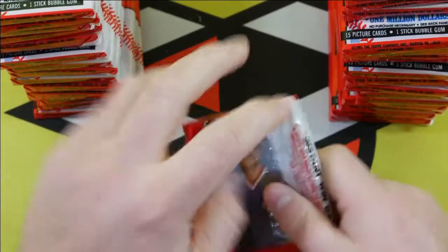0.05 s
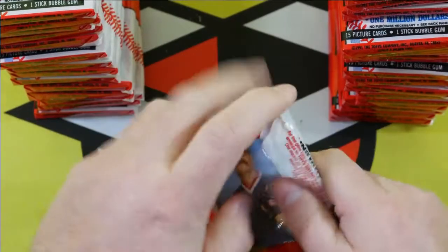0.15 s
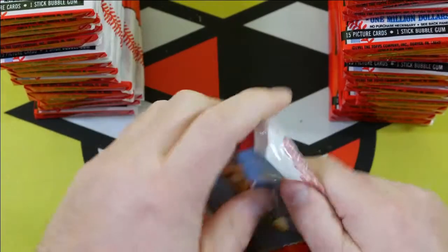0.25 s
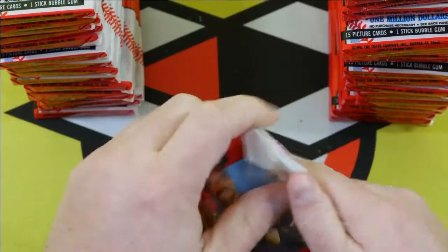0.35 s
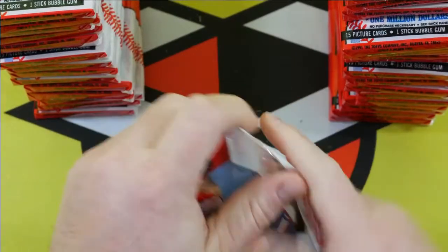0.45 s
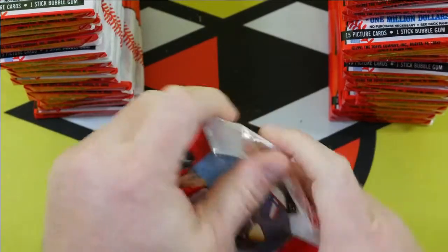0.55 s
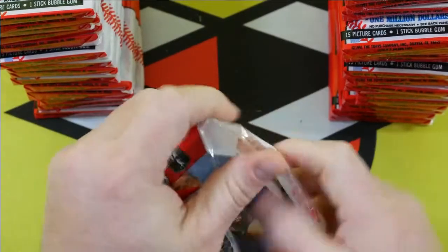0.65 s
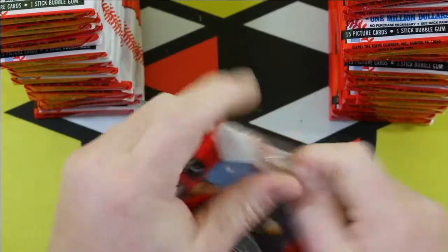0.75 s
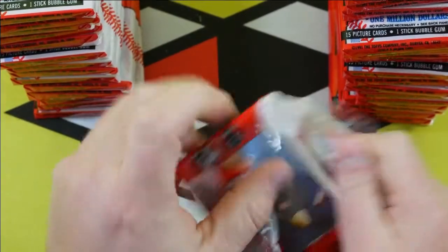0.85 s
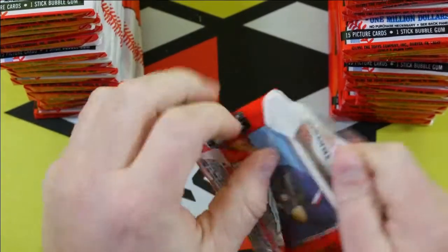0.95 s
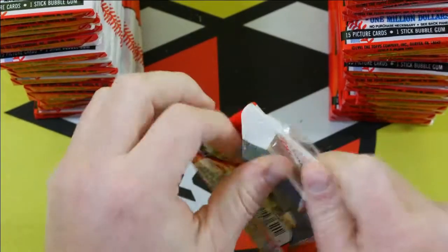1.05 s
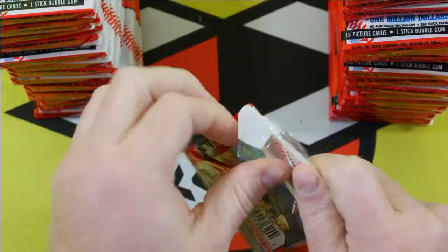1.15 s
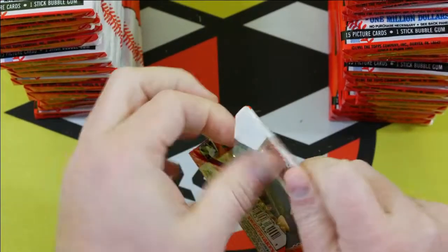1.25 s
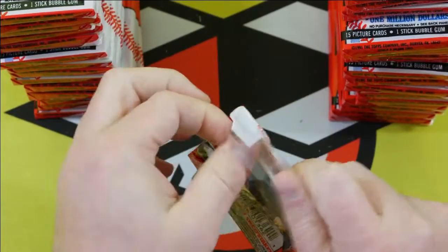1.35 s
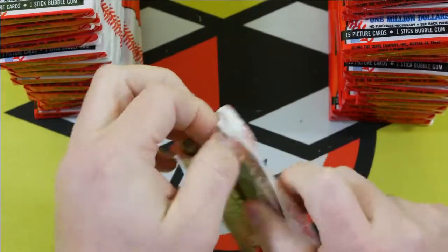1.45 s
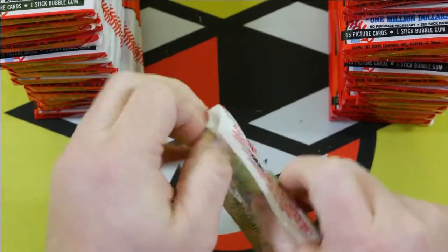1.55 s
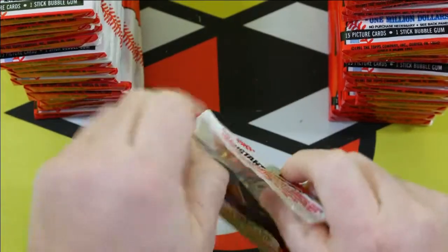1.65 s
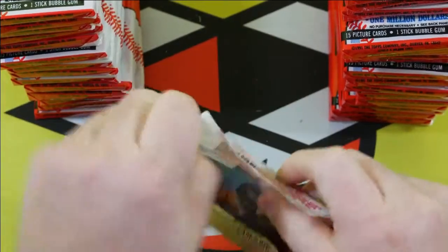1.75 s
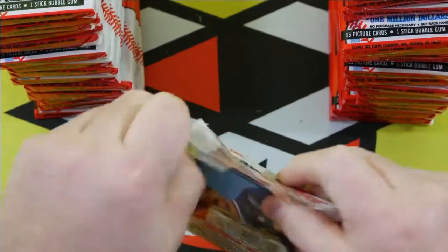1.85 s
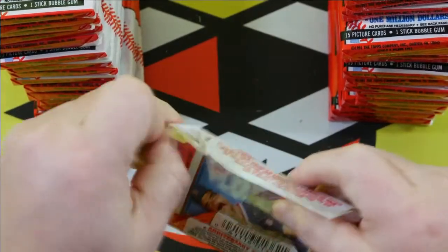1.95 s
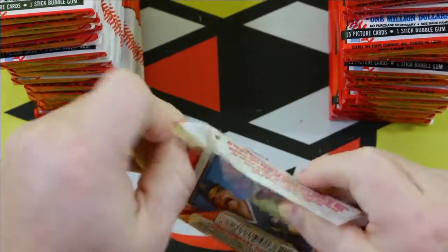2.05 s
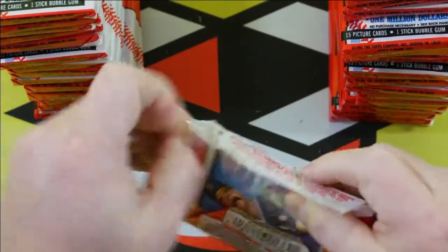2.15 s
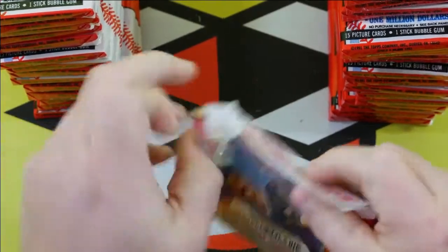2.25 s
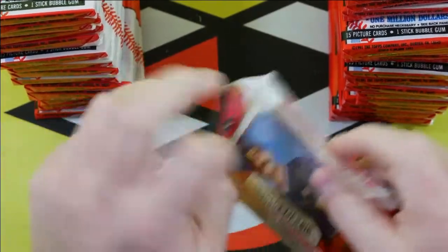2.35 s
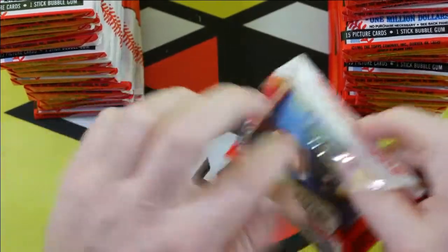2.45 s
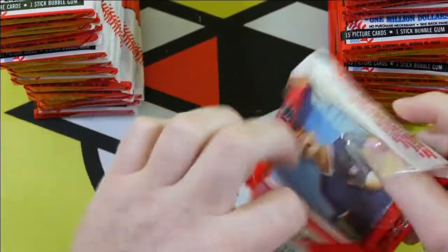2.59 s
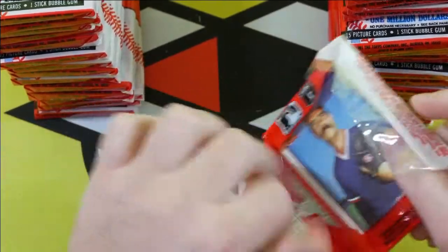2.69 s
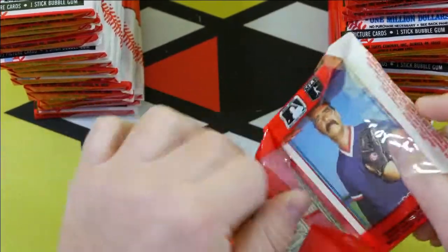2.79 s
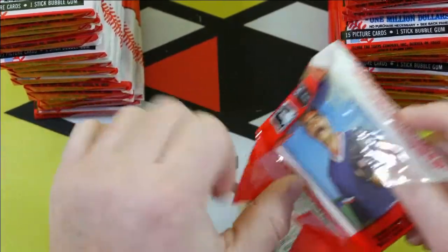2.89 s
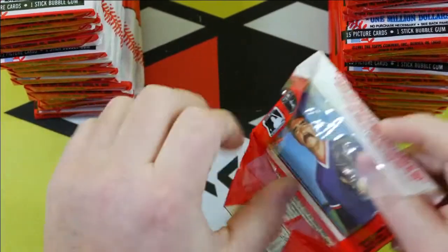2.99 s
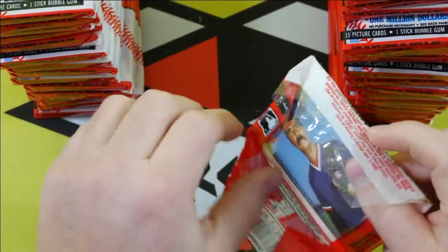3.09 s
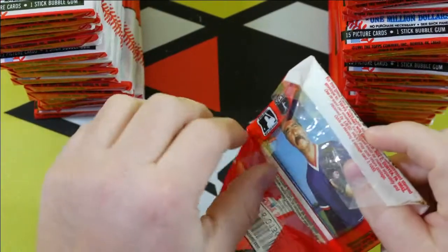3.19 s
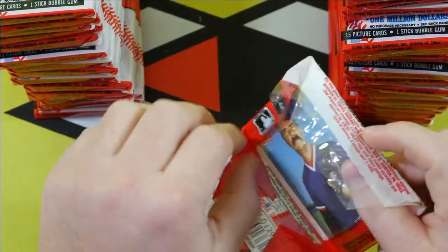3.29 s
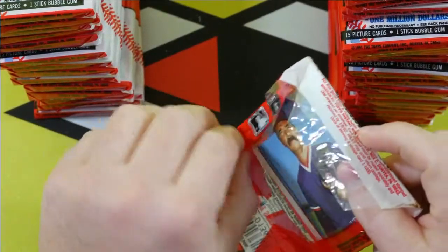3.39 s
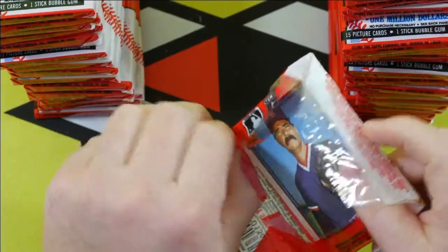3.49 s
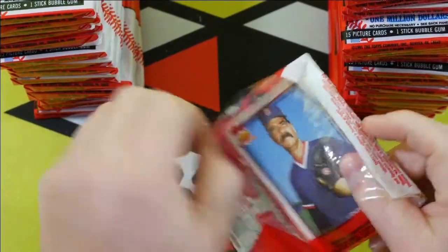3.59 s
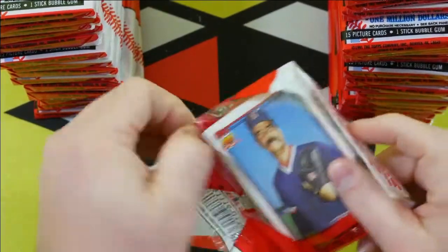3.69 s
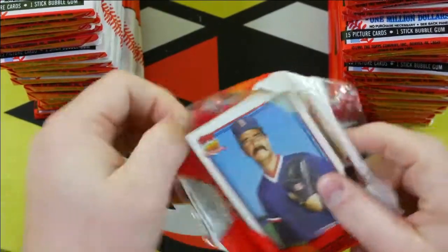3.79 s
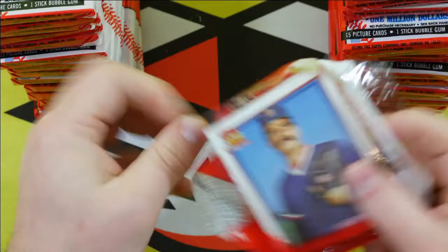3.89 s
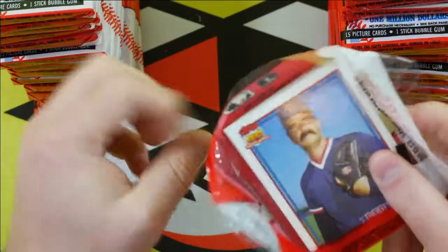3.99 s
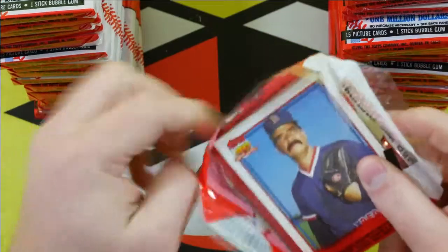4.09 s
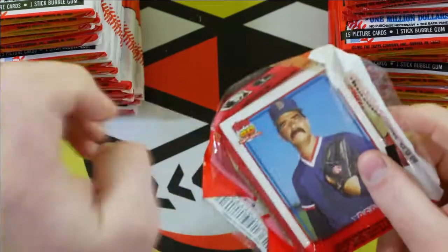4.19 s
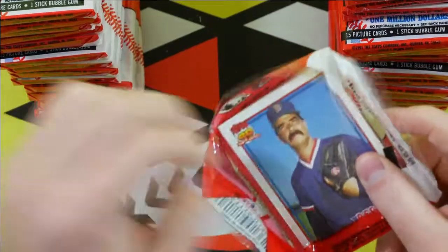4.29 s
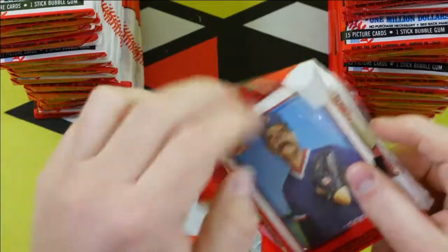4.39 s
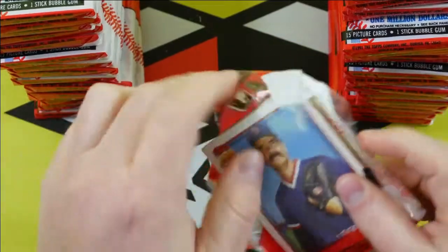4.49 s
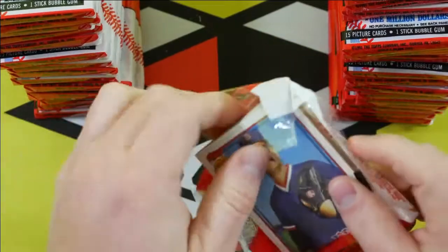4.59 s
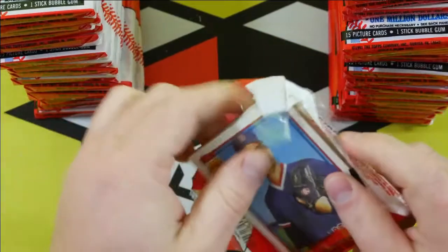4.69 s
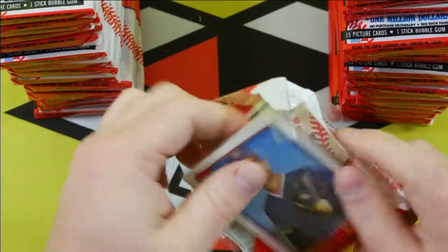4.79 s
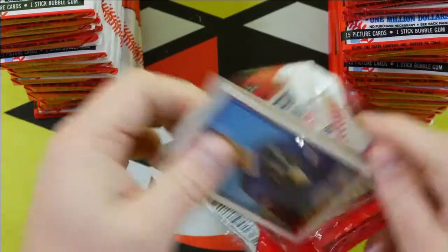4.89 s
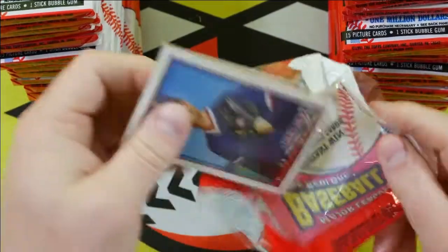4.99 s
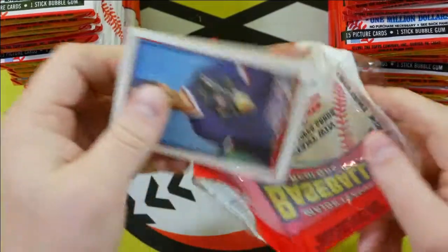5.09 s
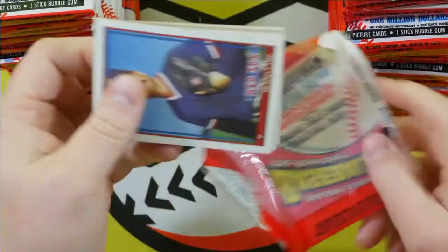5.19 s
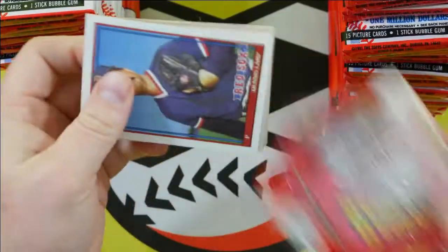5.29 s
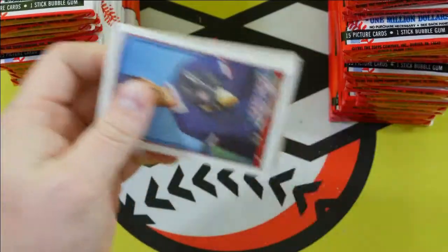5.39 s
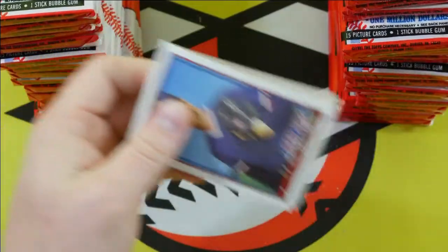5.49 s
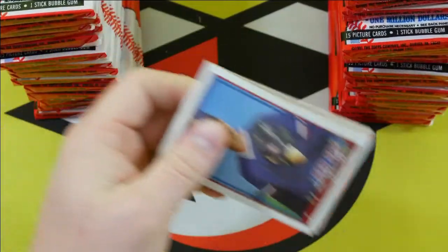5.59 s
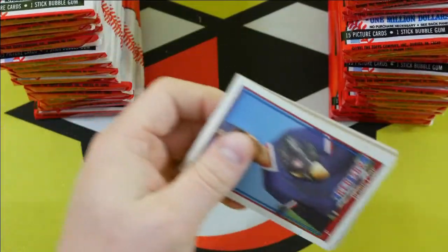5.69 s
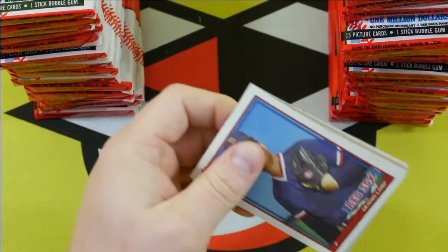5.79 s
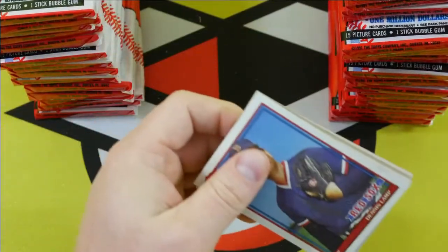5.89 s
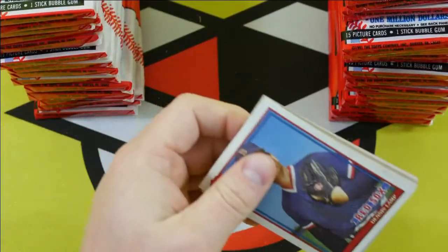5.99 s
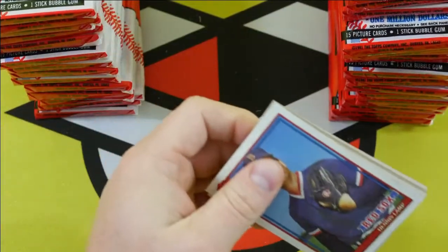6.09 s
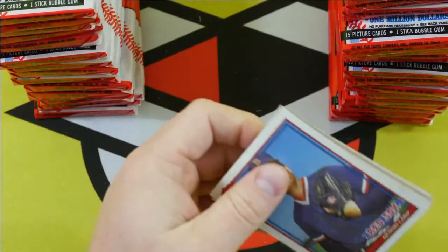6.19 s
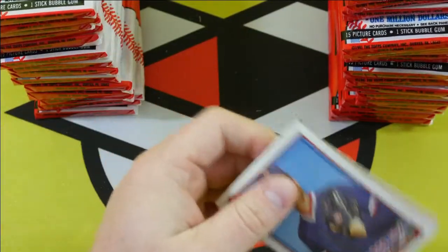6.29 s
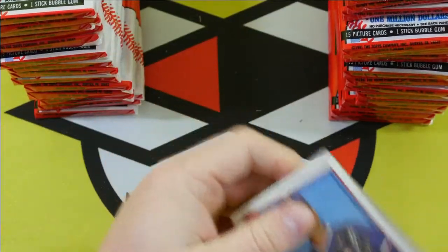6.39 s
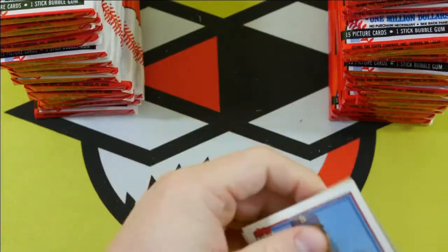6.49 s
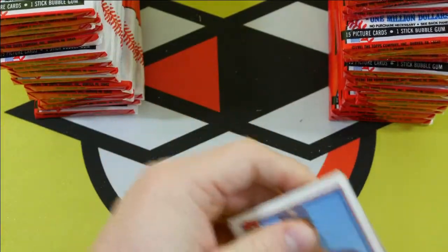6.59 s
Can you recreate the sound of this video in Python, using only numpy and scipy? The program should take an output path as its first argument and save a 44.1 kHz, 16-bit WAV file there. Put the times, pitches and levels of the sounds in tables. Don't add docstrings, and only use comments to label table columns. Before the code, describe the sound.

A thin card wrapper is handled and opened very close to the microphone in a quiet room. From 0 to 1.2 s fingers pick at it with bright, irregular snaps and fine crackle, peaking in a hard crack with a short rip and low thump near 0.77 s. From 1.25 to 2.1 s creases keep popping, with a strong tearing burst at 1.9 s. Between 2.2 and 3.4 s it unfolds in scattered crackles, with rips and thuds around 2.65 s, then sparser ticks. At 3.6 s a dense, loud peel crackles, repeating more lightly until 4.1 s. Duller, heavier thuds and rubbing come at 4.4 to 4.8 s as the stack slips free. Crinkles weaken from 5 to 5.9 s, leaving a faint smooth card slide near 6.25 s over soft low hum and hiss. Small hollow stack knocks and close table echoes accompany the handling.

```python
import sys
import numpy as np
from scipy import signal
from scipy.fft import rfft, irfft, next_fast_len
from scipy.io import wavfile
from scipy.ndimage import uniform_filter1d, map_coordinates

SR = 44100
rng = np.random.default_rng(int(sys.argv[2]) if len(sys.argv) > 2 else 0)


def store_wav(level_fs):
    pcm = np.round(np.clip(np.atleast_2d(level_fs), -1, 1) * 32767)
    wavfile.write(sys.argv[1], SR, pcm.T.astype(np.int16))


def ratio_of_db(decibels):
    return 10 ** (np.asarray(decibels, float) / 20)


N = 293265
LOAD_S = 0.006


def unit(x):
    return x / np.sqrt(np.mean(x ** 2) + 1e-20)


def along(points, hz):
    f, v = np.transpose(points)
    return np.interp(np.log(hz + 1), np.log(f + 1), v)


def wobble(rate):
    knots = rng.standard_normal(int(N * rate / SR) + 4)
    return map_coordinates(knots, [np.arange(N) * rate / SR])


def coloured(x, spectrum):
    m = 2 * next_fast_len(N // 2 + 4096)
    gain = ratio_of_db(along(spectrum, np.fft.rfftfreq(m, 1 / SR)))
    cepstrum = irfft(np.log(gain + 1e-6), m)
    cepstrum[1:m // 2] *= 2
    cepstrum[m // 2 + 1:] = 0
    return unit(irfft(rfft(x, m) * np.exp(rfft(cepstrum)), m)[:N])


def resonance(f, hz, q):
    return 1j * f * hz / q / (hz * hz - f * f + 1j * f * hz / q)


def scattered(start_s, rows):
    at = np.round(start_s * SR).astype(int)[:, None] + np.arange(rows.shape[1])
    return np.bincount(np.clip(at, 0, N).ravel(), rows.ravel(), N + 1)[:N]


# (start [s], length [s], crackle [dB], rub of the pack [dB], weight on the table [dB])
HAND_MOVES = [(0.0, 0.085, -49, -58, -37.5), (0.1, 0.37, -42.5, -61, -46.5), (0.496, 0.23, -49, -59.5, -70),
              (0.78, 0.12, -43.5, -58, -62), (0.923, 0.21, -56, -57.5, -44.5), (1.29, 0.029, -55, -57, -66),
              (1.4, 0.25, -50, -53.5, -60), (1.668, 0.16, -49.5, -56, -61),
              (1.916, 0.098, -39.5, -50.5, -37), (2.123, 0.22, -57, -60, -52),
              (2.398, 0.44, -47.5, -57, -43.5), (3.233, 0.14, -47.5, -69.5, -58),
              (3.569, 0.2, -37.5, -48, -49), (3.837, 0.13, -41.5, -53.5, -42),
              (4.04, 0.087, -54, -55.5, -71), (4.377, 0.25, -47.5, -55, -50), (4.7, 0.29, -47.5, -55, -66),
              (5.013, 0.28, -58, -59.5, -48), (5.46, 0.34, -60, -67, -53.5), (5.764, 0.16, -70, -63, -70)]


def gripped(column, attack_db_per_s, release_db_per_s):
    t = np.arange(0, N, 64) / SR
    moves = np.array(HAND_MOVES)[:, :, None]
    start, length = moves[:, 0], moves[:, 1]
    early = np.maximum(start - t, 0)
    late = np.maximum(t - start - length, 0)
    power = ratio_of_db(moves[:, column] - attack_db_per_s * early - release_db_per_s * late) ** 2
    still = ratio_of_db(-90) ** 2
    return np.interp(np.arange(N) / SR, t, 10 * np.log10(power.sum(0) + still))


def rub_level():
    return gripped(column=3, attack_db_per_s=500, release_db_per_s=150)


# (frequency [Hz], level per Hz [dB])
TABLE_RUMBLE = [(5, -2.5), (13, 11.5), (21, 5.5), (32, -2), (55, -8.5), (90, -23), (140, -41.5)]
# (frequency [Hz], level per Hz [dB])
BUILDING_HUM = [(10, -37.5), (30, 4.5), (85, -4), (120, -15.5), (200, -36.5)]
# (frequency [Hz], level per Hz [dB])
MIC_HISS = [(80, -12.5), (130, 3), (250, -5.5), (900, -11.5), (3000, -14.5), (14500, -17.5), (16000, -30)]


def background():
    weight_db = gripped(column=4, attack_db_per_s=17, release_db_per_s=17)
    table = ratio_of_db(weight_db - 2.5 + 2.2 * wobble(4.93)) * coloured(rng.standard_normal(N), TABLE_RUMBLE)
    building = ratio_of_db(-61 + 0.46 * wobble(3.1)) * coloured(rng.standard_normal(N), BUILDING_HUM)
    hiss = ratio_of_db(-69) * coloured(rng.standard_normal(N), MIC_HISS)
    return table + building + hiss


# (delay [s], level [dB])
NEAR_ECHOES = [(.0022, -4), (.0035, -8), (.009, -7.5), (.01, -11), (0.016, -30), (.0182, -32.5),
               (0.025, -33)]


def crack(t, run_s, dull):
    loading = t / LOAD_S
    shape = ratio_of_db(-19) * loading ** 2 * (loading < 1)
    for late_s, echo_db in [(0.0015, 0.015)] + NEAR_ECHOES:
        u = (t - LOAD_S - late_s) / run_s
        burst = np.exp(-np.abs(u))
        spike = 2.5 * np.exp(-np.abs(u) / 0.14)
        shape = shape + ratio_of_db(dull * echo_db) * (u > 0) * (burst + spike)
    return shape


def grains(count, spread_db, clump_db, clump_rate):
    u = rng.random((count, 3))
    size_db = np.minimum(-spread_db * np.log(1 - u[:, 1]), 11)
    size = ratio_of_db(size_db) * np.sign(u[:, 2] - .5)
    return np.bincount((u[:, 0] * N).astype(int), size, N) * ratio_of_db(clump_db * wobble(clump_rate))


# (frequency [Hz], level per Hz [dB])
FILM_COLOUR = [(880, -21.5), (1700, -0.5), (4000, -0.5), (7000, 3), (12500, -5), (15700, -13)]
# (frequency [Hz], level per Hz [dB])
PACK_COLOUR = [(200, -7.5), (330, -3), (450, -6.5), (600, 0.5), (780, -1.5), (1000, -2), (1400, -0.5),
               (2400, -3), (4000, -7.5), (9000, -15.5)]
# (frequency [Hz], level per Hz [dB])
SHUFFLE_COLOUR = [(41, -27), (70, 0.5), (141, -4.5), (216, -3), (372, -11.5), (500, -19), (650, -36),
                  (1100, -120)]


def handling():
    film_db = gripped(column=2, attack_db_per_s=500, release_db_per_s=280)
    pack_db = rub_level()
    f = np.fft.rfftfreq(N, 1 / SR)
    shape = crack(np.arange(1500) / SR, run_s=0.00095, dull=0.54)
    clumps = ratio_of_db(2.6 * wobble(45))
    crackle = 0.09 * rng.standard_normal(N)
    for panel_hz in (2600, 4300, 6500, 9500, 13000):
        ticks = np.abs(grains(count=800, spread_db=12.5, clump_db=-1.5, clump_rate=37))
        strength = signal.fftconvolve(ticks, shape)[:N]
        cracks = clumps * strength * rng.standard_normal(N)
        crackle += 0.67 * unit(irfft(rfft(cracks) * resonance(f, panel_hz, 0.66), N))
    rub = coloured(clumps * ratio_of_db(3.5 * wobble(70)) * rng.standard_normal(N), PACK_COLOUR)
    shuffle = coloured(clumps ** .5 * rng.standard_normal(N), SHUFFLE_COLOUR)
    lifted_db = -9 * (np.arange(N) / SR < 1.6)
    rustle = ratio_of_db(film_db - 7.5) * coloured(crackle, FILM_COLOUR) + ratio_of_db(pack_db - 1.5) * rub
    return rustle, ratio_of_db(pack_db - 3.5 + lifted_db) * shuffle


# (time [s], peak level [dB], pitch [Hz])
FINGER_THUDS = [(0.024, -48, 318), (0.446, -50.5, 170), (0.761, -39.5, 60.6), (0.759, -40, 265),
                (1.071, -49.5, 258), (1.4, -49.5, 159), (4.591, -38.5, 230), (1.781, -47.5, 126),
                (1.917, -37.5, 118), (2.412, -46.5, 164), (2.665, -38.5, 306), (2.726, -45, 428),
                (2.782, -45.5, 157), (2.854, -50, 165), (3.315, -52.5, 153), (3.56, -46.5, 155),
                (3.623, -42.5, 149), (3.844, -42, 102.6), (3.97, -38.5, 116), (4.066, -46.5, 122),
                (4.47, -37, 207), (4.555, -32, 166), (4.7, -41, 166), (4.754, -46, 168),
                (4.817, -40.5, 260), (4.946, -46, 122), (5.08, -53.5, 196), (5.274, -47, 239),
                (4.789, -52, 169), (5.877, -50, 238), (0.188, -53, 130), (1.498, -52, 128), (1.6, -50, 129),
                (2.198, -51, 141), (2.99, -57.5, 280), (3.332, -50.5, 297), (4.969, -46, 274),
                (5.441, -54, 176), (6.25, -60, 262), (2.82, -48, 298), (1.985, -42.5, 55),
                (4.73, -42.5, 65), (4.63, -43, 75)]


def thuds():
    s, db, hz = np.transpose(FINGER_THUDS)[:, :, None]
    turns = np.arange(2048) / SR * hz
    lump = turns * np.exp(-1.8 * turns) * np.sin(2 * np.pi * turns)
    return scattered(s[:, 0], ratio_of_db(db + 16.0) * lump)


# (time [s], peak level [dB], panel [Hz], sheen of the treble [dB])
CREASE_SNAPS = [(0.0244, -31, 3740, -8), (0.044, -47, 7200, 0), (0.074, -29, 4100, 3),
                (0.09, -18.5, 5270, -16), (0.102, -18.5, 5500, -10), (0.138, -25, 3800, -5.0),
                (0.1636, -34, 5500, -2.0), (0.1781, -12, 7160, -3), (0.1851, -20, 5700, -7.0),
                (0.1926, -20, 5200, -5.0), (0.2024, -23, 4100, 5), (0.253, -18, 8730, 3.5),
                (0.2734, -13, 5340, -23), (0.2871, -28, 5500, 5), (0.307, -27, 5700, 1),
                (0.319, -24.5, 7100, 5), (0.328, -18, 5460, -4), (0.3388, -24, 3220, 2),
                (0.3568, -26.5, 3700, -4), (0.384, -24.5, 3800, 6), (0.4037, -18, 4300, 4),
                (0.448, -22.5, 5500, 9), (0.4811, -24, 8000, 2), (0.5295, -42, 7100, -9),
                (0.5892, -31, 4200, -10.0), (0.6631, -15, 9100, -8), (0.6772, -23, 3800, 10.5),
                (0.6873, -18, 5360, -7), (0.729, -19.5, 3570, 5), (0.7574, -21, 4100, 9),
                (0.7655, -8.5, 5350, 6), (0.779, -14, 5700, -2), (0.8, -30.5, 8600, 15),
                (0.85, -20.5, 4700, 6), (0.8852, -20.5, 5760, -2), (0.8918, -18.5, 5900, -15),
                (0.922, -24.5, 3120, -5.0), (0.9741, -21.5, 3740, 1), (0.9861, -18, 7000, -16),
                (1.0136, -33.5, 7500, 10.5), (1.0537, -33, 4050, -26), (1.0738, -14.5, 3820, -13),
                (1.15, -45, 4230, -13),
                (1.2561, -22.5, 4000, -5), (1.2727, -29.5, 4630, 5), (1.317, -19, 4250, -3),
                 (1.3483, -25, 5600, -9), (1.356, -21, 4640, -3), (1.363, -19.5, 7200, -3),
                 (1.3937, -29, 8800, 6), (1.4, -24, 5530, -12), (1.4323, -25, 4300, 5),
                 (1.446, -23.5, 9000, -2), (1.4665, -26.5, 7300, 7), (1.4818, -19.5, 4270, 4),
                 (1.487, -21, 4300, -6.0), (1.497, -22.5, 4380, 9), (1.524, -31.5, 4700, 9),
                 (1.5735, -21, 8200, 2), (1.6008, -17.5, 7400, -6), (1.6395, -19, 4460, 8.5),
                 (1.6551, -27, 3600, 12.5), (1.6984, -35, 3860, 0), (1.7253, -19.5, 4050, 7.5),
                 (1.746, -14.5, 4400, -7), (1.779, -14.5, 5860, -8), (1.7969, -14, 4100, 5.5),
                 (1.843, -29, 4200, 14.5), (1.8803, -18, 7440, -12), (1.8886, -24.0, 7300, -5),
                 (1.9171, -18, 4600, 10), (1.922, -9.0, 5800, 1), (2.0028, -29.0, 3700, 1),
                 (2.0348, -14.5, 9000, -5.5), (2.0943, -15, 2560, -6), (2.108, -27, 6900, -11),
                (2.1969, -16.5, 7550, -2.5), (2.231, -30, 4300, -1.0), (2.275, -29, 5450, -16),
                   (2.2938, -37, 2780, 2.0), (2.329, -13, 5800, 3.5), (2.3358, -26, 6500, 0),
                   (2.4032, -28, 6100, 7), (2.4268, -30, 5300, 13), (2.4449, -15, 6150, -15),
                   (2.514, -24, 8950, 6), (2.532, -29, 8200, 2), (2.5491, -33, 6900, -7),
                   (2.5542, -20.5, 3630, 6), (2.5842, -21.5, 3880, 5), (2.6437, -22.0, 4430, 2),
                   (2.65, -16, 6850, -5), (2.6613, -12, 5760, 2.5), (2.7522, -29, 4330, 9),
                   (2.779, -20.5, 7100, 1), (2.7892, -21, 4200, 1), (2.8465, -37, 5600, 9),
                   (2.86, -32, 5600, -4), (2.9326, -35, 4530, -10), (2.949, -42, 4860, -11),
                   (2.9904, -25.5, 4770, 2), (2.9982, -23.5, 9400, -20), (3.114, -38, 8600, -9),
                   (3.215, -12.5, 7900, 1.5), (3.2213, -25, 7460, 4), (3.232, -33, 7700, -9),
                   (3.256, -26.5, 5530, -7), (3.3092, -31, 3800, 7), (3.3173, -26, 3440, 3),
                   (3.3514, -29, 6700, 1), (3.3593, -30, 5700, -4), (3.4078, -30.5, 8300, -4),
                   (3.4588, -40, 5200, -7.0),
                (3.5024, -40, 5900, -3), (3.512, -40, 4700, 12), (3.517, -21.5, 2180, -4),
                 (3.527, -29, 3400, 1), (3.5653, -21.5, 7200, 11), (3.6172, -15, 3950, -10),
                 (3.6241, -12.5, 6360, -6), (3.6451, -13.5, 3900, 2), (3.6563, -12, 7170, 1.5),
                 (3.7215, -19.5, 5500, 4), (3.7367, -18.5, 3800, 12.5), (3.777, -23.5, 4240, 6),
                 (3.7967, -28, 3000, 6), (3.8266, -32, 2500, -12.0), (3.8466, -17, 8400, 2),
                 (3.889, -34, 3440, -12), (3.9654, -20.5, 2800, 6), (3.9786, -20, 3600, 0),
                 (3.986, -21.5, 7500, 6.5), (4.0043, -14, 2400, -16), (4.0806, -19, 7600, -10),
                 (4.1157, -31.5, 5170, 5), (4.18, -32.5, 7500, -14), (4.322, -27.5, 2660, -2),
                 (4.347, -26, 7260, 0.5), (4.3826, -24, 7000, 0), (4.388, -30, 6600, 6),
                 (4.398, -31, 7100, 5), (4.4472, -32, 6860, 7), (4.474, -22.5, 7600, 6),
                 (4.512, -24.5, 3500, -12), (4.5427, -17.5, 2600, 4.0), (4.551, -17.5, 2500, -4),
                 (4.5567, -23.5, 2600, 6), (4.5708, -23, 2400, 10), (4.5774, -23, 5500, 4),
                 (4.5882, -25.5, 6500, 7), (4.594, -23, 7000, -2),
                (4.686, -37, 2330, 16), (4.7033, -22, 7200, -4), (4.71, -21.5, 2220, -14),
                  (4.7384, -38, 5400, 4.0), (4.755, -28.5, 2780, 6), (4.7903, -25.5, 4030, 5),
                  (4.8244, -24, 3870, 6), (4.8317, -31, 6000, 1.0), (4.8479, -28, 9050, 8.5),
                  (4.89, -22, 5100, 6), (4.9283, -21.5, 7100, -18), (4.9537, -30, 7800, 4),
                  (4.9669, -21, 3680, 9), (4.983, -28, 6130, -8.0), (5.0124, -28, 3940, -6),
                  (5.0353, -27, 3570, -18), (5.08, -28.5, 7470, 0), (5.127, -30.5, 6200, 4),
                  (5.1347, -28, 6040, -7), (5.143, -25.5, 6600, -1), (5.182, -25, 4000, -13),
                  (5.2032, -32, 4000, 13.5), (5.246, -20.5, 5200, 4), (5.254, -23.5, 3460, 8.5),
                  (5.2806, -35, 3520, -5.0), (5.3196, -28.5, 3400, 3), (5.4018, -37.5, 6900, -5.0),
                  (5.445, -36, 2600, -16), (5.4575, -40, 2300, -16), (5.4766, -56, 3060, -12),
                  (5.49, -19, 6700, 8), (5.5937, -32.5, 2400, 3), (5.624, -37.5, 6700, -5),
                  (5.6736, -33.5, 6260, -3), (5.727, -30, 3580, -3), (5.7437, -36, 3700, -9.0),
                  (5.768, -38.5, 7100, 1), (5.8828, -52, 3700, 10), (5.8911, -41.5, 5200, 4)]
TAUT_TICKS = [
    (0.443, -38, 13000, 6),
    (2.5145, -21, 13500, 7.5),
    (2.523, -34, 12900, 6),
    (2.7215, -25, 13500, 1),
    (2.765, -36, 12000, 5),
    (1.0727, -18.5, 11300, 4),
]


def snaps():
    creases = CREASE_SNAPS + TAUT_TICKS
    s, db, hz, sheen_db = np.transpose(creases)[:, :, None]
    chance = rng.standard_normal((len(s), 2))
    bright_db = -16.5 + 2 * chance[:, :1]
    dull_db = rub_level()[(s * SR).astype(int)] - db + 11.5 + 4 * chance[:, 1:]
    t = np.arange(2048) / SR
    f = np.fft.rfftfreq(2048, 1 / SR)
    run_s = 0.0012 * np.exp(0.2 * rng.standard_normal((len(s), 1)))
    shapes = [crack(t, run_s, 1.0), crack(t, 2.5 * run_s, 2.6), crack(t, 1.8 * run_s, 0.27)]
    cracks = rng.standard_normal((3, len(s), 2048)) * shapes
    cracks /= np.linalg.norm(cracks, axis=2, keepdims=True)
    thin = f * f / (f * f + 1800 ** 2)
    panel = thin * (resonance(f, hz, 2.4) + ratio_of_db(-5.5) * resonance(f, 2980, 0.33) ** 2)
    bright = ratio_of_db(bright_db + 7.0) * resonance(f, 9600, 1.0) ** 2
    treble = 1 / (1 + (8500 / (f + 1)) ** 6)
    sheen = 1 + (ratio_of_db(1.02 * sheen_db - 2.0) - 1) * treble
    dull = ratio_of_db(dull_db + 11.5) * ratio_of_db(along(PACK_COLOUR, f))
    heard = irfft(np.sum(rfft(cracks) * [panel * sheen, bright * sheen, dull], 0))
    return scattered(s[:, 0] - LOAD_S, ratio_of_db(db + 13.0) * heard)


# (time [s], length [s], level [dB], centre [Hz], body of the pack [dB])
SEAM_RIPS = [(0.167, 0.057, -49, 6500, 4), (0.402, 0.075, -45, 6200, 8), (0.761, 0.04, -36, 5760, 4.5),
             (1.438, 0.064, -51, 5070, 2), (1.743, 0.15, -47.5, 5600, -12), (1.916, 0.075, -30, 6250, -2.5),
             (2.423, 0.045, -35.5, 5540, -6.5), (2.526, 0.1, -38.5, 8850, -12),
             (2.626, 0.063, -43, 2930, 5), (2.658, 0.038, -32, 4550, 5.5), (2.712, 0.067, -37.5, 5250, 0),
             (3.308, 0.036, -47.5, 4230, 8), (3.614, 0.027, -32.5, 5000, 1),
             (3.637, 0.069, -32.5, 6400, -9.5), (3.844, 0.02, -35.5, 5100, 3.5),
             (3.955, 0.064, -37, 3500, 1), (4.455, 0.057, -41, 5000, -2), (4.54, 0.086, -42.5, 2470, 2),
             (4.543, 0.046, -36, 2110, -19), (4.81, 0.035, -40.5, 4040, 1), (4.95, 0.054, -41, 4420, -3),
             (6.23, 0.13, -56, 4700, -3), (6.238, 0.032, -54.5, 2010, -6)]


def rips():
    s, length, db, hz, body_db = np.transpose(SEAM_RIPS)[:, :, None]
    spiky_db = 3 + 0.15 * np.clip(-30.5 - db, 0, 14) * (s < 6)
    u = np.arange(8192) / SR / length
    f = np.fft.rfftfreq(8192, 1 / SR)
    lumps = uniform_filter1d(rng.standard_normal((2,) + u.shape), size=50, axis=2) * np.sqrt(50)
    uneven = ratio_of_db(1.3 * spiky_db * np.minimum(lumps + lumps[0], 4) / 2)
    seam, body = rfft(uneven * rng.standard_normal(lumps.shape))
    soft = 1 / (1 + (f / 11000) ** 2)
    seam = seam * resonance(f, hz, 0.29 * (6000 / hz) ** 1.7) ** 2 * soft
    volley = irfft(seam + body * ratio_of_db(body_db + along(PACK_COLOUR, f)))
    volley /= np.std(volley, axis=1, keepdims=True)
    swell = np.sin(np.pi * np.clip(u, 0, 1) ** 0.5)
    return scattered(s[:, 0], ratio_of_db(db) * swell * volley)


# (time [s], peak level [dB], pitch [Hz])
STACK_KNOCKS = [(0.449, -42, 816), (0.765, -28.5, 614), (0.923, -47, 615), (0.974, -48, 730),
                (1.074, -43, 610), (1.317, -48, 850), (1.401, -38, 786), (1.498, -44, 620),
                (1.59, -42.5, 630), (1.921, -47, 740), (1.961, -37, 570), (2.197, -45, 736),
                (2.402, -50, 620), (2.547, -52, 760), (2.665, -36, 660), (2.789, -39, 537),
                (2.859, -44, 723), (3.567, -44, 590), (3.623, -35, 625), (3.741, -42, 560),
                (3.832, -47, 583), (3.952, -41, 576), (4.082, -45.5, 575), (4.413, -47, 577),
                (4.473, -44, 610), (4.79, -52, 576), (5.447, -52, 783), (5.727, -53.5, 783),
                (5.889, -52, 584)]
# (time [s], peak level [dB], pitch [Hz])
EDGE_CLICKS = [
    (1.318, -42, 1405),
    (1.498, -47, 1790),
]


def knocks():
    s, db, hz = np.transpose(STACK_KNOCKS + EDGE_CLICKS)[:, :, None]
    t = np.arange(4096) / SR
    ring = np.sin(2 * np.pi * hz * t) + 0.38 * np.sin(2 * np.pi * 1.2 * hz * t)
    t60_s, rise_s = 0.047, 0.00091
    return scattered(s[:, 0], ratio_of_db(db + 1.5 - 60 * t / t60_s) * (1 - np.exp(-t / rise_s)) * ring)


# (frequency [Hz], time to fall 60 dB [s])
ROOM_DECAY = [(300, 0.37), (2000, 0.29), (6000, 0.15), (14000, 0.1)]


def room(x, tail_db):
    out, hop = x.copy(), SR // 8
    first_wall = round(.0075 * SR)
    for a in range(0, N, hop):
        hz, t, z = signal.stft(rng.standard_normal(SR // 3), SR, nperseg=128)
        decay = ratio_of_db(-60 * t / along(ROOM_DECAY, hz)[:, None])
        tail = signal.istft(z * decay, SR, nperseg=128)[1]
        tail = np.pad(tail / np.linalg.norm(tail), (first_wall, 0))
        wet = signal.fftconvolve(x[a:a + hop], tail)[:N - a]
        out[a:a + len(wet)] += ratio_of_db(tail_db) * wet
    return out


# (frequency [Hz], Q [-], gain [-])
DESK_MODES = [(319, 26, 0.2), (569, 27, 0.56), (783, 45, 1), (1340, 40, 0.21), (1726, 110, 0.45),
              (2014, 140, 0.16), (2428, 32, 0.43), (3836, 52, 0.4)]


def desk(x):
    f = np.fft.rfftfreq(N, 1 / SR)
    modes = sum(gain * resonance(f, hz, q) for hz, q, gain in DESK_MODES)
    return irfft(rfft(x) * (1 + modes), N)


def scene():
    rustle, shuffle = handling()
    near = snaps() + rustle + rips() + ratio_of_db(1.5) * thuds()
    return (desk(room(near, tail_db=-7.5)) + knocks() + shuffle + background())[None]


def low_pass(x):
    return signal.sosfilt(signal.butter(12, 16960, fs=SR, output="sos"), x)


def record(dry):
    f = np.fft.rfftfreq(N, 1 / SR)
    rolloff = ratio_of_db(-38 * np.clip((f - 15680) / 330, 0, 1))
    return low_pass(irfft(rfft(dry) * rolloff * (f > 5), N))


dry = scene()
out = record(dry)
store_wav(out)
```